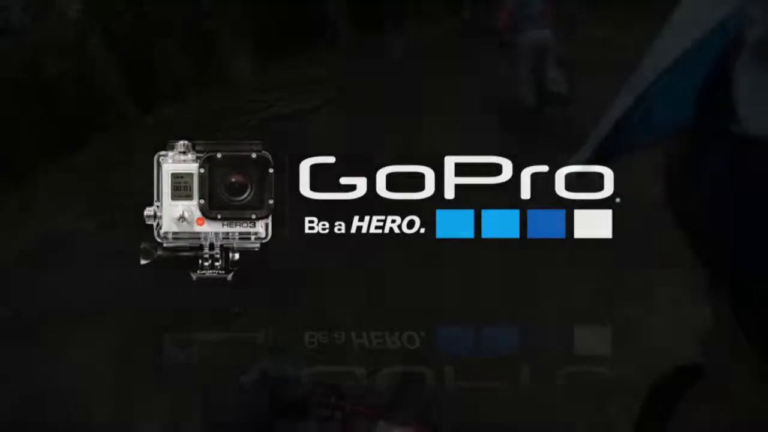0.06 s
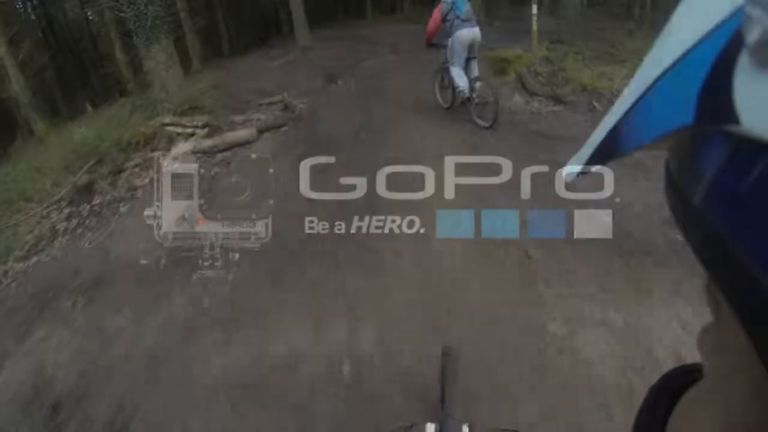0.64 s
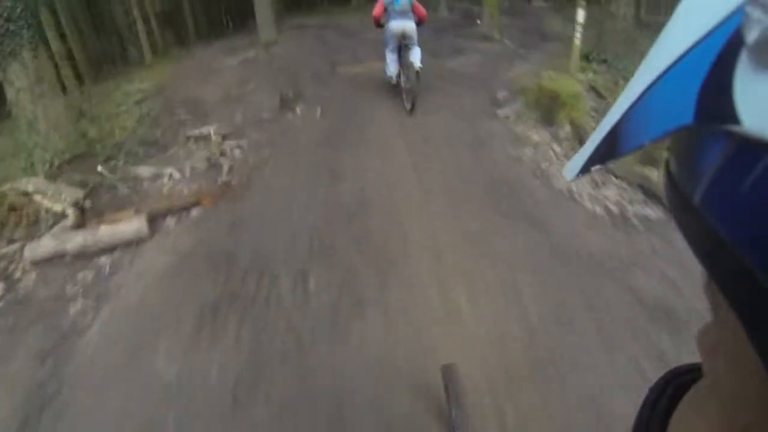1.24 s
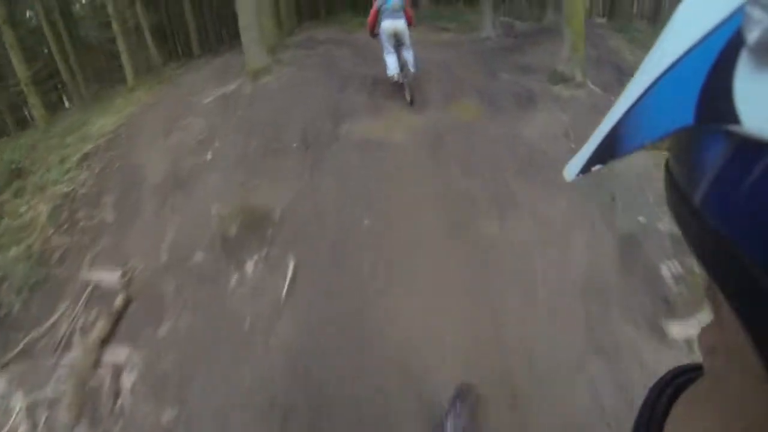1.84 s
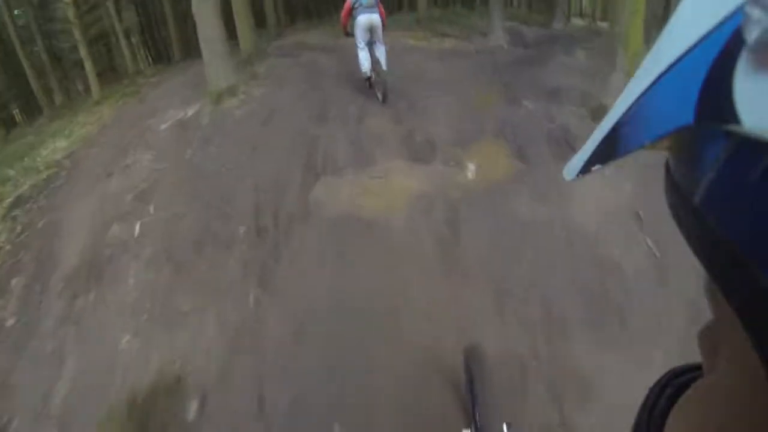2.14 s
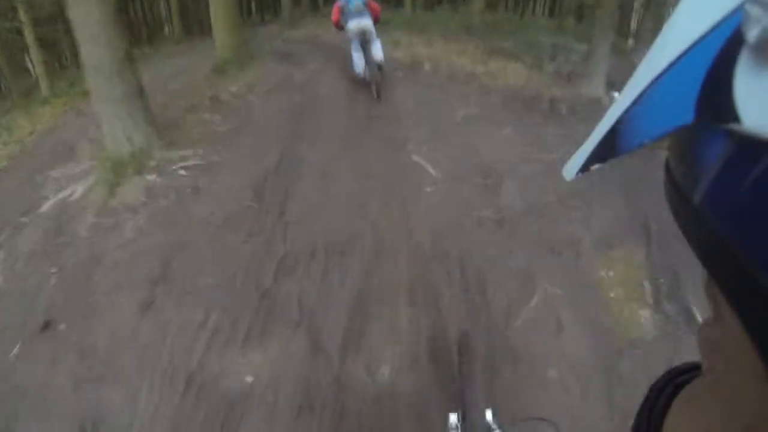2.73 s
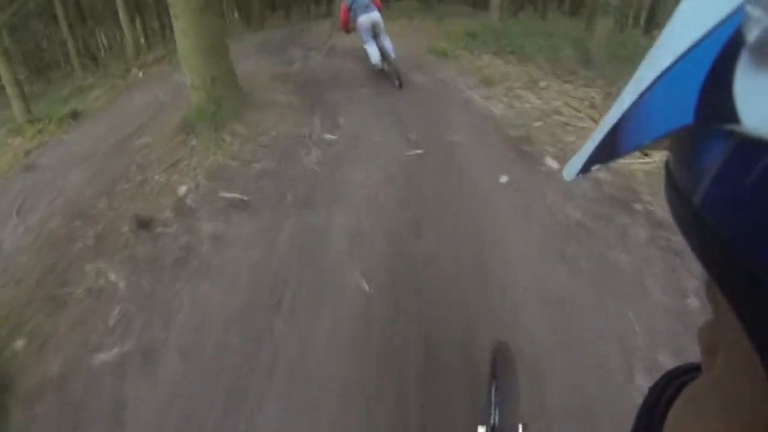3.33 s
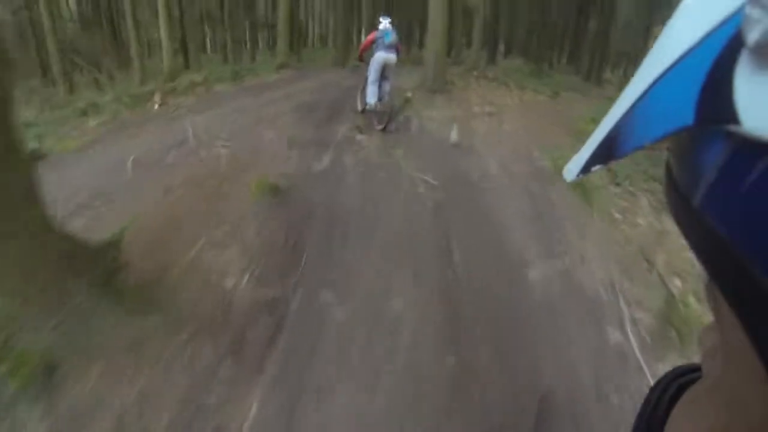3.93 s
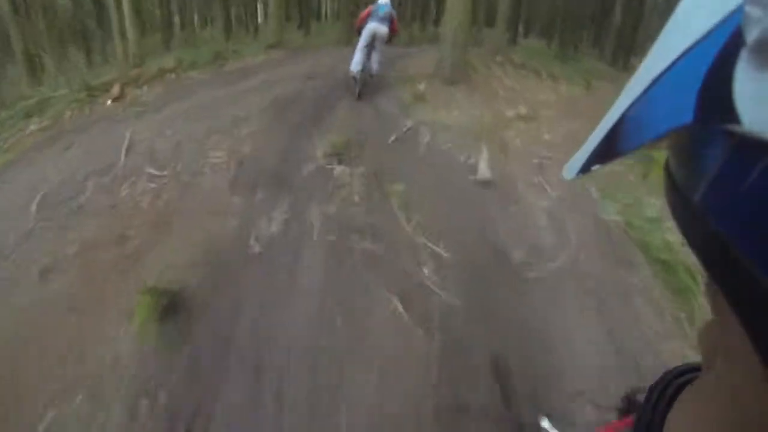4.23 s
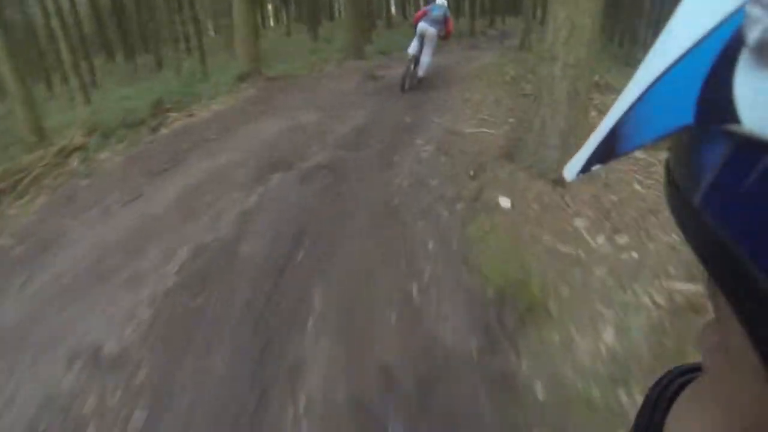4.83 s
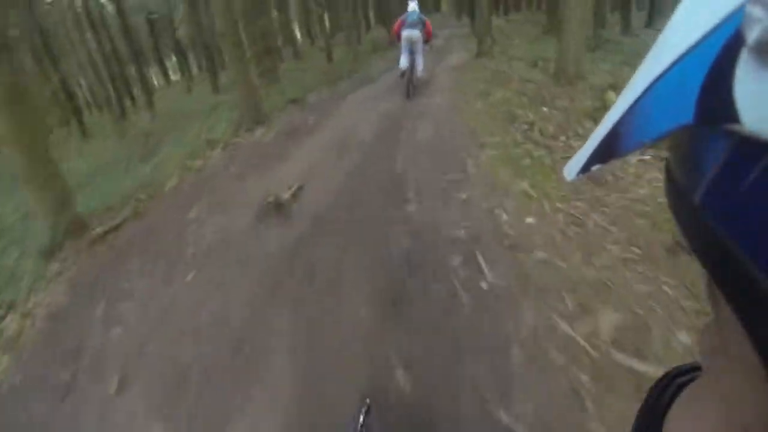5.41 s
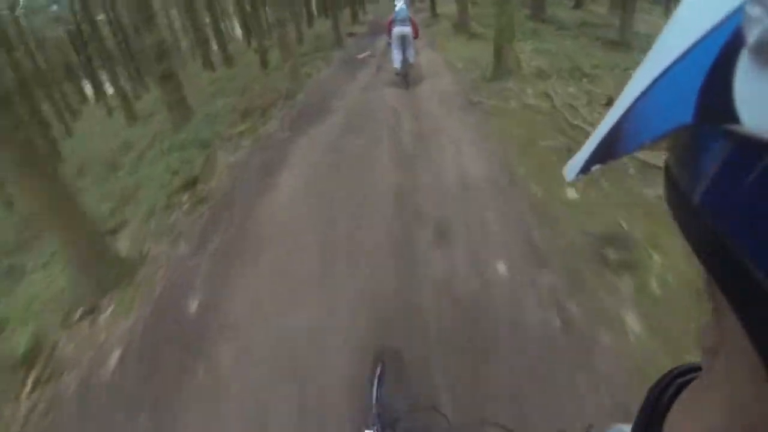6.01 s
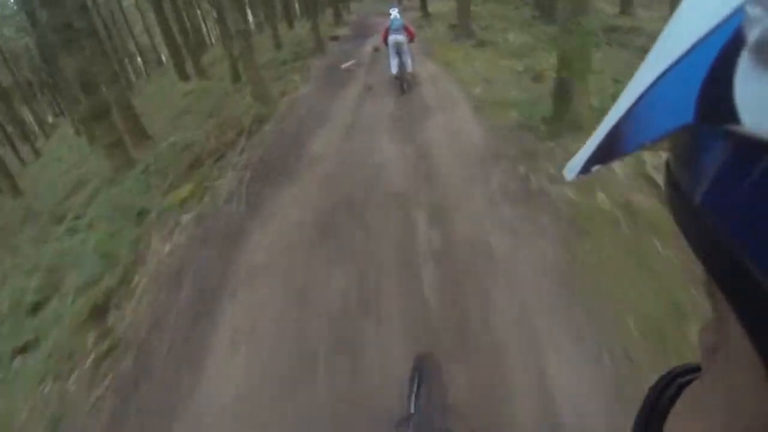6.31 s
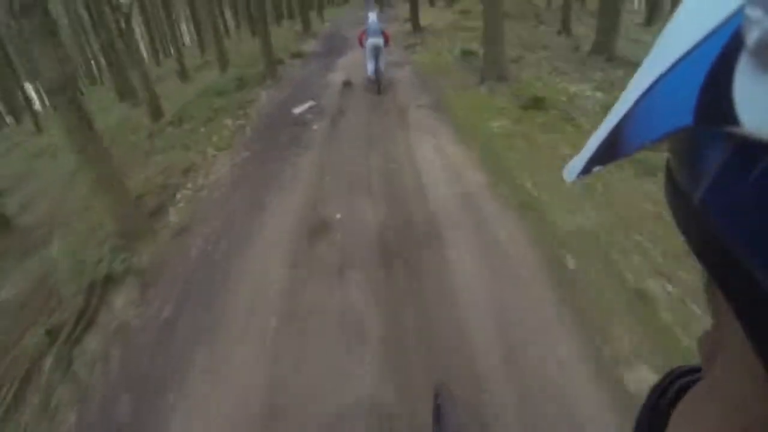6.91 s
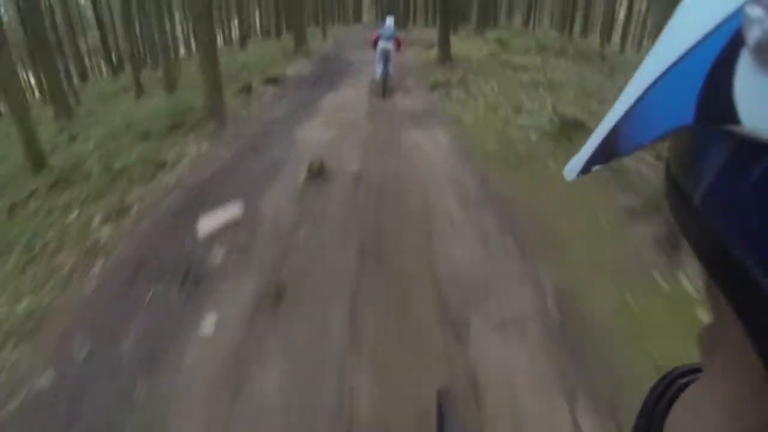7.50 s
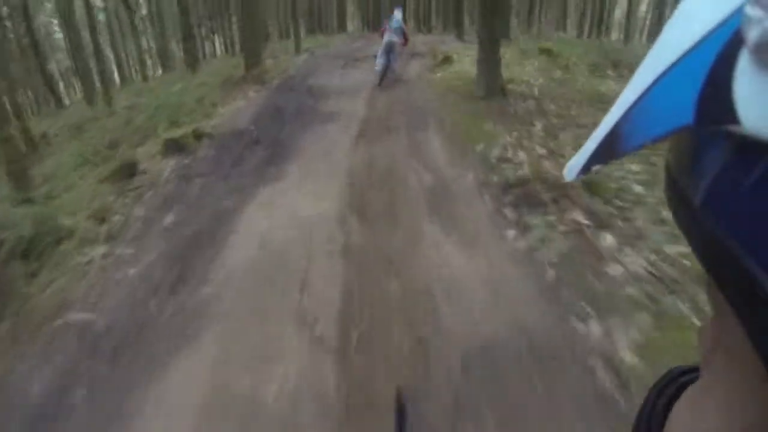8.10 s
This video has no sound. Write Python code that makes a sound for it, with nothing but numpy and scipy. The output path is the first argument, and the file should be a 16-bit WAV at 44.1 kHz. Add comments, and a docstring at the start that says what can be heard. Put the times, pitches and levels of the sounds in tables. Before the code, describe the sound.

A mountain bike speeds downhill on dirt, its muffled tyre crunch, knocks and rattles mixed with rising, gusty wind rumble.

```python
"""On a dirt trail, a mountain bike gathers speed downhill, heard by a helmet camera in a closed case.
Turbulent air buffets the plastic case, and the tyres roar, crunch and scrub as they crush the soil.
Bumps excite the damped modes of the mount and shake the chain, frame and cables.
Grit ticks against the bike under a thin, high hiss. The sound fades in at the start."""
import sys
import numpy as np
from scipy import signal
from scipy.fft import rfft, irfft, next_fast_len
from scipy.io import wavfile
from scipy.ndimage import uniform_filter1d, map_coordinates

SR = 44100
rng = np.random.default_rng(int(sys.argv[2]) if len(sys.argv) > 2 else 0)


def wrap_up_sound(samples):
    """Save the sound to the file named by the first command line argument, as 16-bit audio."""
    columns = np.atleast_2d(samples).T
    # keep every value between -1 and 1, then stretch to whole-number steps
    tamed = np.clip(columns, -1, 1)
    steps = np.round(tamed * 32767).astype(np.int16)
    wavfile.write(sys.argv[1], SR, steps)


N = 359415

# rolling noise of the tyres, as relative levels: time_s, roar_db, crunch_db, hiss_db
TYRE_LEVELS = [(0, -42, -45.5, -63), (1.0, -42.5, -43, -62), (1.15, -44, -45, -63.5),
               (1.8, -43.5, -43, -60.5), (2.25, -37, -38.5, -59), (2.6, -40, -41, -59.5),
               (2.85, -38, -38.5, -57), (3.42, -40, -41, -58), (3.7, -39, -38, -58.5),
               (4.2, -39, -41.5, -60.5), (4.75, -38, -41.5, -63), (5.25, -37, -38, -60.5),
               (5.55, -33.5, -37.5, -59.5), (5.8, -36, -38, -60), (6.55, -32.5, -37.5, -61.5),
               (7.3, -32.5, -34.5, -55), (7.65, -32.5, -34.5, -57.5), (8.15, -27, -31, -55)]
# transmission through the closed case: frequency_hz, gain_db
CASE_RESPONSE = [(150, -3.5), (400, 8), (900, 11), (1300, 2), (1800, 7), (2400, -3.5), (2950, -1),
                 (3500, -11.5), (5200, -26.5), (6500, -39), (15000, -43)]
CRUNCH_TRIM_DB = -3


def wind(gust_s=0.016, buffet_trim_db=-3, rush_trim_db=-2.5):
    """Turbulent pressure: large eddies thump the case; smaller ones rush past it in flurries."""
    # relative levels, rising with airspeed: time_s, buffet_db, rush_db
    levels = [(0, -34, -53), (.75, -29, -41.5), (1.0, -32.5, -43.5), (1.35, -27, -41), (1.85, -29, -39.5),
              (2.3, -25, -36.5), (2.9, -24, -36), (3.05, -26, -38), (3.6, -23, -34), (4.1, -23.5, -33),
              (4.4, -19, -31), (5.2, -20.5, -32.5), (5.45, -24, -31), (6.1, -18, -31), (6.55, -20.5, -29),
              (7.2, -17, -25), (7.75, -19, -24.5), (8.03, -13.5, -23), (8.15, -22.5, -20.5)]
    # single large eddies (+) and calm pockets (-): time_s, change_db
    gusts = [(.55, -5), (.68, -3), (.92, 6), (1.75, -4), (2.25, 2), (2.944, 8.5), (3.01, -3.5), (3.12, -1),
             (3.2, 8.5), (4.28, 1), (4.6, -5), (4.84, -1), (4.915, -4), (5.06, -2), (5.16, 1), (5.25, 3),
             (5.32, -10), (5.56, -4), (5.72, -14), (5.84, 3), (6.48, -9), (6.86, 7), (7.09, 1), (7.18, 7),
             (7.67, 5.5), (8.01, 4.5)]
    # spectra of fast buffeting, slow buffeting and rush: frequency_hz, density_db
    fast_spectrum = [(10, -7), (25, 2), (45, -0.5), (72, -0.5), (110, -5.5), (160, -16.5), (260, -23.5),
                     (600, -83.5)]
    slow_spectrum = [(10, -6.5), (25, 5.5), (50, -3), (80, -3.5), (110, -11.5), (160, -16), (260, -42),
                     (600, -75)]
    rush_spectrum = [(70, -9.5), (140, 2.5), (200, 0.5), (300, -3), (400, -9), (600, -14), (1200, -30.5),
                     (3000, -70), (6000, -73)]
    t = np.arange(N) / SR
    buffet_db, rush_db = curves(levels)
    gust_db = sum(db * np.exp(-((t - s) / gust_s) ** 2) for s, db in gusts)
    buffet_db = buffet_db + buffet_trim_db + gust_db + 1.42 * wobble(rate=12)
    eddies = rng.standard_normal(N)
    # faster air is louder and sheds its eddies at a higher rate
    fast = np.clip((buffet_db + 34) / 9, 0, 1)
    buffet = fast * shaped(eddies, fast_spectrum) + (1 - fast) * shaped(eddies, slow_spectrum)
    # the low rumble is held even, then swells and dips with speed, gusts and a slight flutter
    buffet /= np.sqrt(np.abs(uniform_filter1d(buffet ** 2, size=5000)) + 1e-6)
    rush = shaped(rng.standard_normal(N), rush_spectrum)
    rush_db = rush_db + rush_trim_db + 0.49 * gust_db + 1.95 * wobble(rate=45)
    return amp(buffet_db) * buffet + amp(rush_db) * rush


def tyres(roar_trim_db=-3.6, hiss_trim_db=-4):
    """Rolling noise: knobs crush soil and stones, and uneven ground modulates the load."""
    # spectra of the three bands: frequency_hz, density_db
    roar_spectrum = [(200, -16), (450, -3.5), (650, -2), (820, 2), (950, -0.5), (1100, -4.5), (1400, -12.5),
                     (2200, -41.5), (5000, -81)]
    crunch_spectrum = [(600, -6.5), (1000, -5.5), (1330, -4.5), (1680, -1.5), (1950, -4), (2330, -8.5),
                       (2880, -8), (3200, -14), (3550, -27.5), (3900, -30), (4400, -37), (5100, -29),
                       (6200, -69), (12000, -62)]
    hiss_spectrum = [(2500, -11), (3800, 8.5), (4400, -0.5), (5100, 3), (5800, -6), (7200, -8.5),
                     (8200, -4.5), (9000, -9.5), (10000, -5), (11700, -12), (12600, -8), (14200, -20),
                     (15200, -9.5)]
    # resonance of the crunch: time_s, centre_hz
    resonance = [(0, 1680), (2.2, 1740), (3.4, 1730), (3.8, 1850), (4.6, 1626), (6.5, 1670), (7.0, 1820),
                 (7.35, 1770), (7.6, 1640), (8.15, 1680)]
    roar_db, crunch_db, hiss_db = curves(TYRE_LEVELS)
    load_db = 1.4 * wobble(rate=30)
    roar_db += roar_trim_db + load_db + 0.9 * wobble(rate=60)
    crunch_db += CRUNCH_TRIM_DB + load_db + 0.9 * wobble(rate=70)
    hiss_db += hiss_trim_db + 1.13 * load_db
    stones = grains(rate=190, spread_db=4.5)
    roar = shaped(rng.standard_normal(N) + 0.66 * grains(rate=160, spread_db=6), roar_spectrum)
    crunch = shaped(rng.standard_normal(N) + 0.53 * stones, crunch_spectrum)
    crunch = moving_resonance(crunch, curves(resonance)[0])
    hiss = shaped(rng.standard_normal(N) + 0.28 * stones, hiss_spectrum)
    return amp(roar_db) * roar + amp(crunch_db) * crunch + amp(hiss_db) * hiss


def mount_knocks(body_db=-0.5, case_db=-5.5, crack_db=-2, crack_s=0.0021):
    """Modal ringing: each jolt rings the mount; hard ones reach the upper modes of the case."""
    # hollow knocks: start_s, level_db, edge_db, pitch_hz
    jolts = [(.268, -30, -43, 860), (.786, -37, -46, 880), (.967, -21, -30, 900), (1.417, -27.5, -38, 816),
             (2.007, -31, -47, 860), (2.228, -28.5, -42, 935), (2.3628, -15, -26, 882),
             (2.416, -32, -44, 900), (2.647, -29.5, -32.5, 910), (2.701, -12, -27, 808),
             (2.71, -31, -43, 805), (2.912, -33, -34, 890), (3.134, -30, -34, 920), (3.169, -25, -36, 860),
             (3.224, -26.5, -35, 875), (3.569, -26.5, -32, 810), (3.851, -26.5, -36, 850),
             (3.881, -19.5, -40, 830), (4.405, -31.5, -53, 890), (4.702, -21, -30, 914),
             (4.793, -32, -39, 910), (5.159, -34, -39, 935), (5.537, -31, -33, 840),
             (5.545, -27.5, -40, 885), (5.918, -29, -43, 870), (6.1684, -21, -26, 917),
             (6.847, -21, -30, 885), (6.986, -31.5, -39, 930), (7.160, -23.5, -30, 840),
             (7.312, -26.5, -40, 900), (7.746, -26.5, -39, 870)]
    # modes of the mount and of the case: pitch_ratio, level_db, t60_s
    mount_modes = [(.78, -10, 0.018), (1, 17, 0.016), (1.12, -10, 0.11)]
    case_modes = [(1.4, 13, 0.0066), (1.95, 15.5, 0.014), (2.3, 5.5, 0.029), (2.9, 1.5, 0.039),
                  (3.4, -9, 0.015)]
    # dry crack of the plastic: frequency_hz, density_db
    crack_spectrum = [(150, -17), (420, 9), (900, 13), (1300, -20), (1850, -1), (2500, -2), (2950, -18),
                      (3500, -20), (5200, -32), (6500, -52), (15000, -62)]
    track, t = np.zeros(N), np.arange(SR // 12) / SR
    for s, db, edge_db, hz in jolts:
        burst = rng.standard_normal(len(t)) * np.exp(-t / crack_s)
        crack = peak_unit(shaped(burst, crack_spectrum))
        edge = amp(case_db) * damped_modes(case_modes, hz, t) + amp(crack_db) * crack
        add(track, s, amp(db + body_db) * damped_modes(mount_modes, hz, t) + amp(edge_db) * edge)
    return track


def damped_modes(modes, hz, t, contact_s=0.00086):
    """Superposition of decaying sines, struck a little differently each time through a padded contact."""
    waves = sum(amp(db + rng.standard_normal() - 60 * t / t60) * np.sin(2 * np.pi * hz * ratio * t)
                for ratio, db, t60 in modes)
    return peak_unit(waves * (1 - np.exp(-(t / contact_s) ** 2)))


def clacks(trim_db=-3.5):
    """Impulse response: one hard contact pushes through the case, too damped to ring."""
    # dry contacts over bumps: start_s, level_db, centre_hz
    contacts = [(0.4924, -18, 1000), (.748, -30, 2110), (1.2966, -27.5, 1000), (1.967, -27, 1890),
                (3.1674, -27, 1800), (3.5692, -16.5, 750), (5.536, -24.5, 2100), (7.0702, -23, 1900),
                (7.0713, -25, 1300), (7.165, -21, 1300), (7.6377, -15.5, 1800), (7.7273, -23, 2300),
                (7.861, -24, 1900), (8.076, -17.5, 1890)]
    # their common spectrum: frequency_hz, density_db
    spectrum = [(100, -17), (400, 11), (1300, 4), (2900, -0.5), (3500, -14), (5200, -39), (6500, -40),
                (15000, -41)]
    track, push = np.zeros(N), signal.unit_impulse(SR // 20)
    for s, db, hz in contacts:
        add(track, s, amp(db + trim_db) * peak_unit(band(push, spectrum, hz, octaves=1.24)))
    return track


def rattles(trim_db=2):
    """Impact excitation: bumps shake the chain, the frame and the cables."""
    # chain slaps and dull thuds of the frame: start_s, level_db, centre_hz, length_s
    slaps = [(0.749, -34.5, 1900, 0.0044), (0.83, -38, 2050, 0.0045), (1.092, -37, 2050, 0.0053),
             (1.305, -39, 1870, 0.0069), (1.363, -40, 1400, .005), (1.423, -38.5, 2090, 0.0069),
             (1.638, -37.5, 1670, .005), (1.693, -36.5, 1300, 0.0059), (1.868, -44, 2420, 0.009),
             (2.034, -28, 2000, 0.018), (2.064, -31.5, 1690, 0.011), (2.117, -32.5, 1750, 0.025),
             (2.246, -31.5, 1840, 0.023), (2.353, -25.5, 1930, 0.0083), (2.399, -34, 2100, 0.0043),
             (2.478, -29, 1900, 0.021), (3.166, -33, 2060, 0.03), (3.607, -32, 1350, 0.035),
             (3.636, -32, 1350, .006), (3.793, -38, 1250, .005), (3.988, -31.5, 2270, 0.0087),
             (4.011, -29.5, 1740, 0.011), (4.026, -32.5, 1220, 0.034), (4.893, -34, 1200, 0.0057),
             (4.915, -35.5, 1350, 0.0055), (5.328, -30.5, 1320, .004), (5.399, -30.5, 1490, 0.0096),
             (5.534, -33, 2720, 0.009), (5.606, -32.5, 1400, 0.0076), (6.54, -32, 1730, 0.027),
             (6.774, -27.5, 1570, 0.022), (6.845, -24, 1210, 0.019), (6.877, -25, 1440, 0.006),
             (6.952, -32, 1500, 0.0067), (7.381, -29.5, 1940, 0.0071), (7.726, -28, 2330, 0.01),
             (7.863, -24.5, 1870, 0.0069), (7.935, -26.5, 1350, 0.01), (7.992, -25.5, 1520, 0.016),
             (8.082, -23, 1400, 0.011), (8.135, -23, 1080, 0.0051)]
    thuds = [(1.302, -42, 417, 0.031), (1.445, -36, 620, 0.0033), (2.206, -24.5, 335, 0.0025),
             (2.209, -30, 280, 0.022), (4.695, -37, 447, 0.02), (6.165, -35, 560, 0.0041),
             (6.844, -32, 485, 0.0088), (7.166, -22.5, 490, 0.0089), (7.489, -30, 338, 0.02)]
    # cables and links chink on the frame: start_s, level_db, pitch_hz, length_s
    chinks = [(0.895, -45, 3020, 0.0034), (0.923, -40, 2700, 0.0025), (1.192, -51, 3180, .009),
              (1.522, -49, 2700, 0.0023), (2.478, -35, 2070, 0.0018), (6.883, -22, 1900, 0.0016),
              (7.772, -29, 1234, 0.0022), (7.859, -29, 1635, 0.003), (8.119, -25.5, 1830, 0.0016)]
    track = np.zeros(N)
    for s, db, hz, length_s in slaps:
        add(track, s, amp(db) * rattle(hz, length_s, octaves=0.28, click=0.39))
    for s, db, hz, length_s in thuds:
        add(track, s, amp(db) * rattle(hz, length_s, octaves=0.68, click=0.1))
    for s, db, hz, length_s in chinks:
        add(track, s, amp(db) * chink(hz, length_s))
    return amp(trim_db) * track


def rattle(centre_hz, length_s, octaves, click, first_blow=7.6):
    """Repeated contact: a loose part slaps and rebounds, driving its resonance, muffled by the case."""
    t = np.arange(SR // 8) / SR
    contacts = unit(rng.standard_normal(len(t)) ** 3) * np.exp(-(t / length_s) ** 2)
    contacts[0] += first_blow
    # the resonance stands above the broad click of the contact
    ring_db = lambda hz: 20 * np.log10(click + band_gain(hz, centre_hz, octaves, order=4))
    return peak_unit(colour(contacts, lambda hz: along(CASE_RESPONSE, hz) + ring_db(hz)))


def chink(pitch_hz, length_s, sag=0.076, scrape_db=-5):
    """Vibration under tension: a taut metal part scrapes and rings, its pitch sagging as it slackens."""
    age = np.arange(SR // 8) / SR / length_s
    hz = pitch_hz * (1 - sag * (1 - np.exp(-age / 2)))
    phase_jitter = 0.3 * unit(uniform_filter1d(rng.standard_normal(len(age)), size=40))
    ring = unit(np.sin(2 * np.pi * np.cumsum(hz) / SR + phase_jitter))
    scrape = unit(band(rng.standard_normal(len(age)), CASE_RESPONSE, pitch_hz, octaves=0.33, order=4))
    return peak_unit(age * np.exp(-age) * (ring + amp(scrape_db) * scrape))


def chain_chatter(rate=10, centre_hz=1810, scatter=0.16, over_crunch_db=1.5, spread_db=3.5):
    """Poisson impacts: the chain taps at random, harder where the ground is rougher."""
    track, crunch_db = np.zeros(N), curves(TYRE_LEVELS)[1] + CRUNCH_TRIM_DB
    for i in np.flatnonzero(rng.random(N) < rate / SR):
        size, pitch = np.clip(rng.standard_normal(2), -1.5, 1.5)
        hz = centre_hz * np.exp(scatter * pitch)
        tap = rattle(hz, length_s=0.0045, octaves=0.5, click=0.2, first_blow=3)
        add(track, i / SR, amp(crunch_db[i] + over_crunch_db + spread_db * size) * tap)
    return track


def scrubs(attack_s=0.0041):
    """Sliding friction: a loaded tyre scrubs over the dirt in a thick, gritty burst."""
    # slips of the tyre: start_s, level_db, centre_hz, length_s
    slips = [(1.18, -39, 2000, 0.031), (1.641, -51, 700, 0.027), (2.855, -28.5, 1000, 0.02),
             (2.999, -34.5, 1900, 0.02), (3.779, -31.5, 1900, 0.021), (5.531, -28, 845, 0.064),
             (6.195, -34.5, 1260, 0.044), (7.208, -33.5, 1860, 0.16)]
    track, t = np.zeros(N), np.arange(SR // 4) / SR
    for s, db, hz, length_s in slips:
        impacts = grains(rate=2500, spread_db=5.5)[:len(t)]
        dirt = unit(band(impacts, CASE_RESPONSE, hz, octaves=1.27))
        envelope = (1 - np.exp(-t / attack_s)) * np.exp(-(t / length_s) ** 2)
        add(track, s, amp(db) * envelope * dirt)
    return track


def pebbles(rate=26, pitch_hz=2820, scatter=0.3, decay_cycles=2, trim_db=-4, spread_db=4):
    """Damped oscillation: stones snap from under the knobs, each at its own pitch, through the case."""
    track, t = np.zeros(N), np.arange(SR // 100) / SR
    crunch_db = curves(TYRE_LEVELS)[1]
    for i in np.flatnonzero(rng.random(N) < rate / SR):
        size, pitch = np.clip(rng.standard_normal(2), -1.7, 1.7)
        hz = pitch_hz * np.exp(scatter * pitch)
        snap = peak_unit(np.sin(2 * np.pi * hz * t) * np.exp(-hz * t / decay_cycles))
        add(track, i / SR, amp(crunch_db[i] + trim_db + spread_db * size) * snap)
    return colour(track, lambda hz: np.minimum(along(CASE_RESPONSE, hz), 0))


def gravel(trim_db=10.5):
    """Shot noise: dense impacts merge into brief, bright spurts as the tyres spray loose gravel."""
    # loose patches: middle_s, level_db, half_length_s
    spurts = [(1.427, -63, 0.0093), (1.958, -53, 0.0025), (2.18, -53.5, 0.0054), (2.734, -60, 0.095),
              (2.869, -54, 0.0094), (2.913, -55, 0.02), (3.029, -54.5, 0.02), (3.374, -58, 0.016),
              (3.51, -59, 0.013), (5.538, -56.5, 0.0072), (5.56, -63, 0.018), (6.9, -56.5, 0.081),
              (7.283, -72, 0.081)]
    # colliding gravel: frequency_hz, density_db
    spectrum = [(1500, -20), (2900, 21.5), (3500, 8.5), (4000, 11.5), (4400, -1), (5100, 10), (5800, -11),
                (6600, -0.5), (7400, -33), (8300, -6), (10000, -20), (15000, -21)]
    t = np.arange(N) / SR
    swell = sum(amp(db + trim_db) * np.exp(-((t - s) / half_s) ** 2) for s, db, half_s in spurts)
    return swell * shaped(grains(rate=2800, spread_db=1), spectrum)


def grit(rise_s=0.00082, tick_t60=0.017, spray_db=-15, spray_t60=0.15, trim_db=-3):
    """Two-stage decay: a small stone ticks against the frame, and a softer spray of dirt follows."""
    # stones flicked up: start_s, level_db
    ticks = [(1.966, -52), (3.081, -54), (3.782, -57), (5.015, -48), (5.585, -45), (6.213, -41.5),
             (6.9112, -46), (6.932, -41), (7.021, -46), (7.23, -39.5), (7.242, -42), (7.262, -49),
             (7.334, -55), (7.447, -45), (7.708, -58)]
    # tick and spray: frequency_hz, density_db
    spectrum = [(2000, 0), (4200, 1.5), (5000, 3.5), (6200, -3.5), (7200, -9.5), (8300, 5), (9200, -14),
                (10700, -2.5), (12500, -22), (15000, -26)]
    track, t = np.zeros(N), np.arange(SR // 4) / SR
    decay = amp(-60 * t / tick_t60) + amp(spray_db - 60 * t / spray_t60)
    envelope = decay * (1 - np.exp(-t / rise_s))
    for s, db in ticks:
        tick = shaped(envelope * rng.standard_normal(len(t)), spectrum)
        add(track, s, amp(db + trim_db) * peak_unit(tick))
    return track


def sand(trim_db=-8.5):
    """Modulated shot noise: coarse sand crackles under the knobs in uneven clumps."""
    # crushed sand: frequency_hz, density_db
    spectrum = [(2500, -13), (3800, 5), (5100, 4.5), (6200, -6), (7200, -13), (8300, -5), (9200, -14),
                (10500, -9), (12500, -16), (15000, -24)]
    hiss_db = curves(TYRE_LEVELS)[2]
    clumps = amp(2.5 * wobble(rate=35))
    crackle = clumps * grains(rate=450, spread_db=3.5)
    return amp(hiss_db + trim_db) * shaped(crackle, spectrum)


def high_hiss(flutter_db=1.5):
    """Narrow spectral peaks make a faint hiss whistle; a fine sizzle joins it through the bends."""
    # high treble: time_s, whistle_db, sizzle_db
    levels = [(0, -67, -90), (1.0, -73, -86), (1.6, -75, -90), (1.9, -75, -66), (2.4, -78, -87),
              (2.8, -76, -77), (3.3, -78, -82), (4.45, -76, -67), (4.75, -76, -73.5), (8.15, -74, -77)]
    # its two spectra: frequency_hz, density_db
    whistle_spectrum = [(3000, -47), (4800, -11), (5350, -7), (5900, -15), (9500, -14), (10000, 7.5),
                        (10600, -14), (14000, -16), (15100, -2)]
    sizzle_spectrum = [(3000, -48), (6500, -6), (8300, 6), (9200, 0), (10500, 4), (12500, -3),
                       (15000, -3.5)]
    whistle_db, sizzle_db = curves(levels)
    whistle = shaped(rng.standard_normal(N), whistle_spectrum)
    sizzle_db -= flutter_db * wobble(rate=24.65)
    sizzle = shaped(grains(rate=3500, spread_db=5), sizzle_spectrum)
    return amp(whistle_db) * whistle + amp(sizzle_db) * sizzle


def grains(rate, spread_db):
    """A Poisson train of tiny impacts of uneven size, rate a second."""
    hit = rng.random(N) < rate / SR
    size = amp(spread_db * np.clip(rng.standard_normal(N), -2, 2))
    return unit(hit * size * rng.choice([-1, 1], N))


def wobble(rate):
    """A smooth random curve, rate knots a second."""
    knots = rng.standard_normal(int(N * rate / SR) + 4)
    return map_coordinates(knots, [np.arange(N) * rate / SR])


def moving_resonance(x, centre_hz, lift_db=5, octaves=0.23):
    """A resonance follows centre_hz by cross-fading between three stationary ones."""
    steps = np.geomspace(centre_hz.min(), centre_hz.max(), num=3)
    mix = np.zeros(N)
    for step_hz, share in zip(steps, np.eye(3)):
        peak_db = lambda hz: lift_db * np.exp(-(np.log2((hz + 1) / step_hz) / octaves) ** 2)
        mix += np.interp(centre_hz, steps, share) * unit(colour(x, peak_db))
    return unit(mix)


def band_gain(hz, centre_hz, octaves, order):
    """Band-pass gain that halves at the given octaves either side of the centre."""
    return 1 / (1 + (np.log2((hz + 1) / centre_hz) / octaves) ** order)


def band(x, spectrum, centre_hz, octaves, order=2):
    """Filters in series: a spectrum and a band-pass add in decibels."""
    band_db = lambda hz: 20 * np.log10(band_gain(hz, centre_hz, octaves, order))
    return colour(x, lambda hz: along(spectrum, hz) + band_db(hz))


def colour(x, gain_db):
    """Minimum-phase filter whose gain in dB is a function of frequency."""
    m = 2 * next_fast_len(len(x) // 2 + SR // 20)
    cepstrum = irfft(np.log(amp(gain_db(np.fft.rfftfreq(m, 1 / SR)))), m)
    # folding the cepstrum makes the filter causal
    cepstrum[1:m // 2] *= 2
    cepstrum[m // 2 + 1:] = 0
    return irfft(rfft(x, m) * np.exp(rfft(cepstrum)), m)[:len(x)]


def shaped(x, spectrum):
    """x coloured by a spectrum, at rms 1."""
    return unit(colour(x, lambda hz: along(spectrum, hz)))


def along(spectrum, hz):
    """Interpolate a spectrum on a log frequency axis."""
    points_hz, db = np.transpose(spectrum)
    return np.interp(np.log(hz + 1), np.log(points_hz + 1), db)


def curves(rows):
    """One value per sample for each column after the time."""
    s, *columns = np.transpose(rows)
    return [np.interp(np.arange(N) / SR, s, column) for column in columns]


def amp(db):
    """Decibels to gain."""
    return 10 ** (np.asarray(db) / 20)


def unit(x):
    """Scale to rms 1."""
    return x / np.sqrt(np.mean(x ** 2) + 1e-20)


def peak_unit(x):
    """Scale so that the loudest 4 ms have rms 1."""
    return x / np.sqrt(uniform_filter1d(x ** 2, size=176).max() + 1e-20)


def add(track, s, sound):
    """Mix a sound into the track at time s."""
    part = track[max(0, round(s * SR)):][:len(sound)]
    part += sound[:len(part)]


def scene():
    """Superposition: all pressures add at the one microphone on the helmet."""
    trail = tyres() + scrubs() + high_hiss() + gravel() + sand() + grit() + pebbles()
    bike = mount_knocks() + clacks() + rattles() + chain_chatter()
    return (wind() + trail + bike)[None]


def record(dry):
    """Band limiting: the camera passes nothing above its cutoff. The sound fades in on a power law."""
    fade_start_s, fade_end_s, cutoff_hz = -0.21, 1, 15450
    fade = np.interp(np.arange(N) / SR, [fade_start_s, fade_end_s], [0, 1]) ** 1.58
    m = next_fast_len(N + SR // 2)
    passband = np.fft.rfftfreq(m, 1 / SR) < cutoff_hz
    return irfft(rfft(fade * dry, m) * passband, m)[..., :N]


dry = scene()
out = record(dry)
wrap_up_sound(out)
```